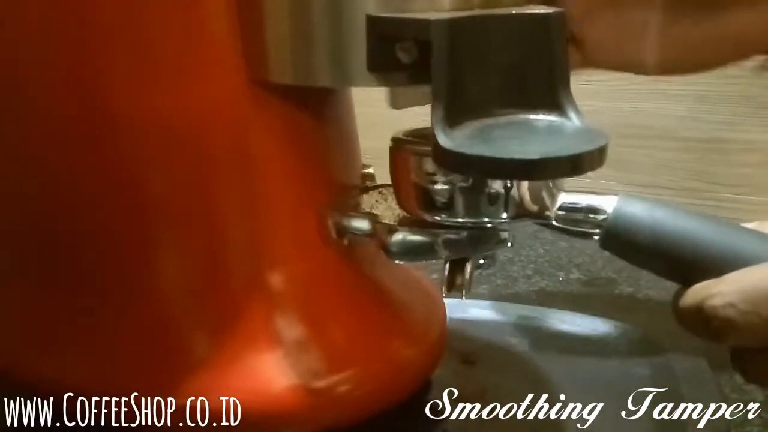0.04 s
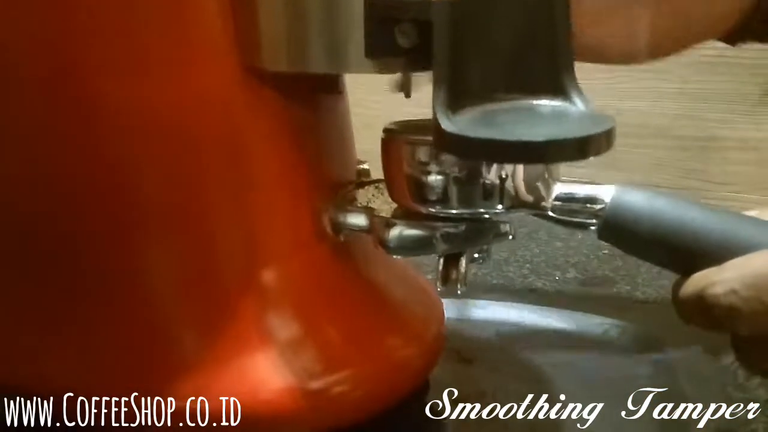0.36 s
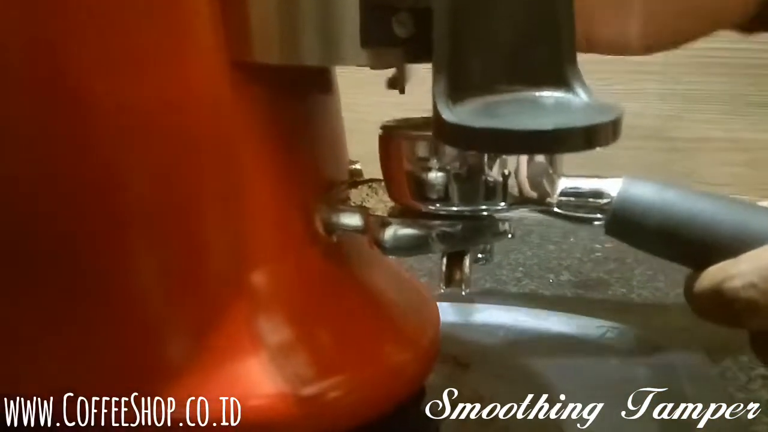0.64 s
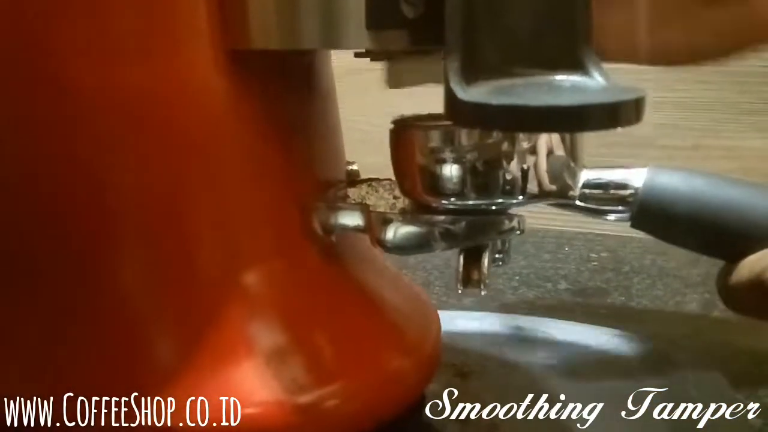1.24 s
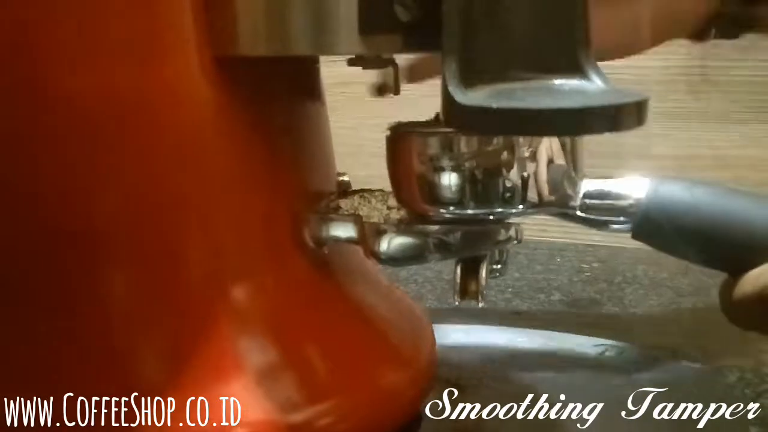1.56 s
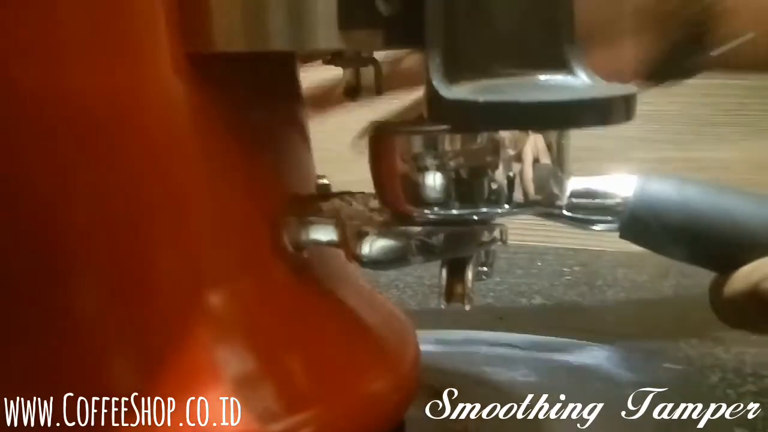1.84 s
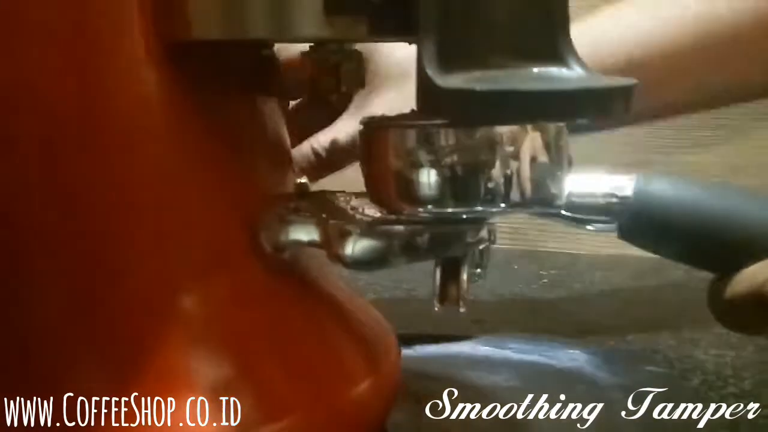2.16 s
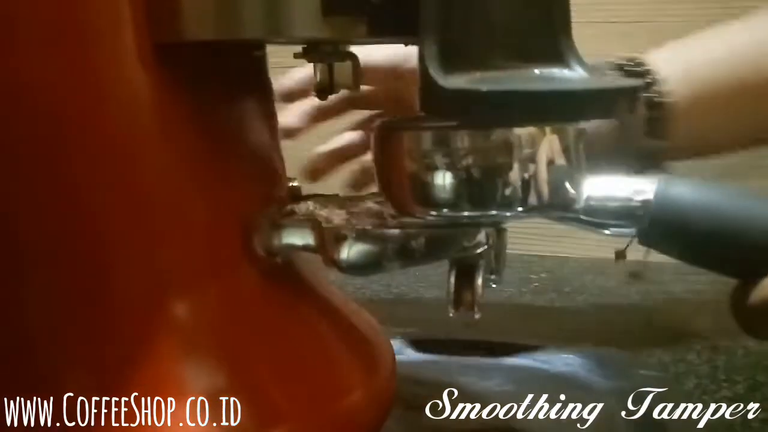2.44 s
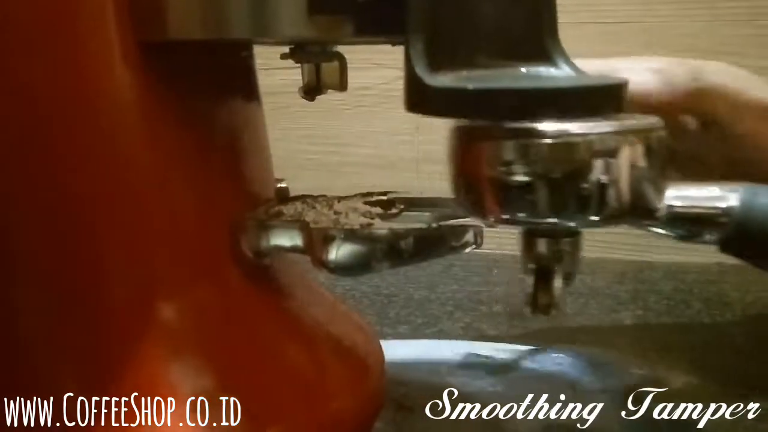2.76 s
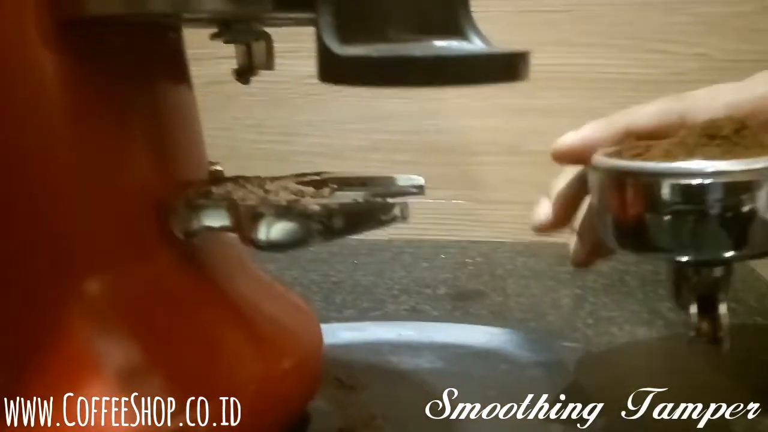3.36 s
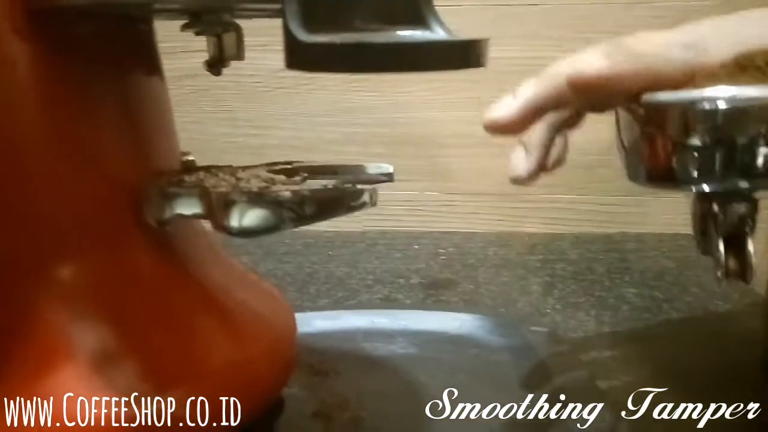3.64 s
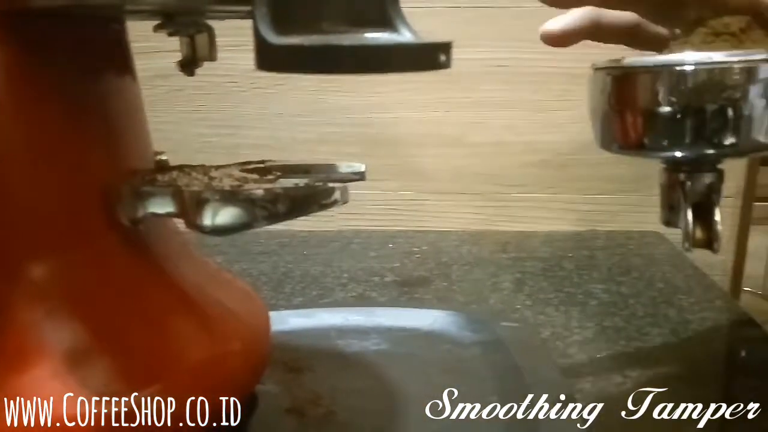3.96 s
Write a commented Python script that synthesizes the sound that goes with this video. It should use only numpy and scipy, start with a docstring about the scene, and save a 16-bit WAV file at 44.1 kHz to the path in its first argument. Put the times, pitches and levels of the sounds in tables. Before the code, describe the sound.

An electric coffee grinder crushes beans close by from the start, a gritty, ringing whir with scattered snaps and dull thuds. Near 1.9 seconds a sharp knock turns the tone more hollow. At 2.4 seconds the motor switches off and quickly runs down with a groan. Around 2.8 seconds a metal filter basket briefly scrapes and squeaks off its holder. Soft, steady room ventilation remains until the end.

```python
"""An electric coffee grinder crushes beans close by, over the steady air noise of a small cafe room.
Tiny cracks and the rubbing of its burrs (the grinding wheels) make its housing ring; single beans snap.
Near 1.9 s a knock changes the load, and the housing rings more hollow.
At 2.4 s the motor is switched off and runs down with a groan.
Last, near 2.8 s, the metal filter basket scrapes and squeaks as it slides off its fork."""
import sys
import numpy as np
from scipy import signal
from scipy.fft import rfft, irfft
from scipy.io import wavfile

SR = 44100
rng = np.random.default_rng(int(sys.argv[2]) if len(sys.argv) > 2 else 0)


def dump_mix(stems):
    """Bounce the given channels to the path in sys.argv[1] as a 16-bit WAV at rate SR."""
    frames = np.atleast_2d(stems).T  # one column per channel
    limited = np.clip(frames, -1, 1)  # hard clip at full scale
    pcm = np.round(limited * 32767).astype(np.int16)
    wavfile.write(sys.argv[1], SR, pcm)


N = 176400
T = np.arange(N) / SR


def amp(db):
    """Turns decibels into a number to multiply by."""
    return 10 ** (np.asarray(db) / 20)


def evened(x):
    """Scales a signal to an average (rms) size of 1."""
    return x / np.sqrt(np.mean(x ** 2) + 1e-20)


def at_pitch(points, hz):
    """Reads between the rows of a table, along a musical (log) pitch scale."""
    pitches, values = np.transpose(points)
    return np.interp(np.log(hz + 1), np.log(pitches + 1), values)


def over_time(points):
    """Joins the (time, value) rows of a table with straight lines."""
    return np.interp(T, *np.transpose(points))


def pan(db):
    """Left and right gains that make the left side louder by db."""
    return amp(np.array([[.5], [-.5]]) * db)


def colour(x, spectrum, balance=((1, 0), (2, 0))):
    """Filters white noise so that each pitch gets its own level and left-right balance."""
    hz = abs(np.fft.fftfreq(4096, 1 / SR))
    log_gain = np.log(amp(at_pitch(spectrum, hz)) * pan(at_pitch(balance, hz)) * np.sqrt(SR / 2))
    taps = np.fft.ifft(np.exp(np.conj(signal.hilbert(log_gain)))).real  # rings only after a hit
    return signal.oaconvolve(x, taps[:, :len(hz) // 2], axes=1)[:, :N]


def stereo(a, b, likeness):
    """Mixes two noises into left and right; likeness 1 is the same, 0 unrelated, -1 opposite."""
    same = np.clip(at_pitch(likeness, np.fft.rfftfreq(N, 1 / SR)), -1, 1)
    right = irfft(same * rfft(a) + np.sqrt(1 - same ** 2) * rfft(b), N)
    return np.array([a, right])


def resonate(x, hz, width_hz):
    """Rings at one pitch; the result is complex, so its wave can be shifted."""
    turn = np.exp(2j * np.pi * hz / SR)
    fade = np.exp(-np.pi * abs(width_hz) / SR)
    return 2 * signal.lfilter([(1 - fade) ** 2], [1, -2 * fade * turn, (fade * turn) ** 2], x)


def wander(hz):
    """A random wobble, mostly slower than hz."""
    smoothing = 1 + (np.fft.rfftfreq(N, 1 / SR) / hz) ** 2
    return evened(irfft(rfft(rng.standard_normal(N)) / smoothing, N))


def fuzzy_tone(hz, width_hz):
    """Noise narrowed to one pitch; the wider, the rougher."""
    return evened(resonate(rng.standard_normal(N), hz, width_hz).real)


# Steady rush of air: pitch_hz, level_db_per_hz
AIR_RUSH = [(20, -91), (50, -112), (105, -80), (150, -93.5), (260, -83), (400, -78), (520, -83), (630, -81),
            (800, -85), (1800, -87), (2400, -91), (3900, -91.5), (4600, -96.5), (5300, -99), (6200, -102),
            (6800, -112), (10000, -115), (16000, -119)]
# Low air noise that comes and goes: pitch_hz, level_db_per_hz
AIR_SWELL = [(20, -100), (100, -95), (180, -95), (290, -78.5), (450, -83.5), (620, -85), (900, -94.5),
             (2000, -94.5), (6000, -125)]
# How far the air leans left: pitch_hz, left_minus_right_db
AIR_BALANCE = [(60, 0.7), (180, 3.5), (550, 5.1), (1650, 8.9), (4970, 9.5), (15000, 2.7)]
# How alike its two sides are: pitch_hz, likeness
AIR_LIKENESS = [(60, 0.67), (180, 1), (550, 0.28), (1650, -0.23), (4970, -0.27), (15000, -0.51)]
def air():
    """Ventilation: a steady rush, slow low swells and a wavering hum."""
    rush = colour(stereo(*rng.standard_normal((2, N)), AIR_LIKENESS), AIR_RUSH, AIR_BALANCE)
    swells = colour(stereo(*rng.standard_normal((2, N)), AIR_LIKENESS), AIR_SWELL, AIR_BALANCE)
    swells *= amp(4.0 * wander(hz=8))
    hum = pan(-5) * amp(-56.5) * fuzzy_tone(hz=392.3, width_hz=17)
    return rush + swells + hum


# Time the echo takes to fade by 60 dB: pitch_hz, fade_s
ECHO_FADE = [(100, 1), (1500, 0.62), (4500, 0.71), (12000, 0.1)]
def room_echo(x):
    """The walls return a blur of echoes, each pitch fading at its own speed."""
    hz, t, noise = signal.stft(rng.standard_normal((2, SR // 2)), SR, nperseg=256)
    fade = amp(-60 * t / at_pitch(ECHO_FADE, hz)[:, None])
    tail = signal.istft(noise * fade * (t > .005), SR, nperseg=256)[1]
    return signal.fftconvolve(x, tail / np.linalg.norm(tail[0]), axes=1)[:, :N]


def crunch(cracks_per_s=2500, spread_db=3, crack_share=0.6):
    """The hiss of rubbing, mixed with many tiny cracks of random size."""
    sizes = amp(spread_db * np.minimum(rng.exponential(1, N), 5)) * rng.choice([-1, 1], N)
    cracks = evened(sizes * (rng.random(N) < cracks_per_s / SR))
    return np.sqrt(crack_share) * cracks + np.sqrt(1 - crack_share) * rng.standard_normal(N)


# The basket catching on its fork: start_s, length_s, pitch_hz, level_db, width_hz
SQUEAKS = [(2.772, 0.012, 3530, -53, 298), (2.794, 0.0074, 3280, -44.5, 257),
           (2.799, 0.011, 1320, -44.5, 170), (2.828, .012, 1347, -48, 120), (2.821, 0.0098, 3090, -49, 149),
           (2.822, 0.025, 3980, -69, 86), (2.836, 0.016, 2030, -45.5, 22.2)]
# How the scrape grows and fades: time_s, gain_db
SCRAPE_LEVEL = [(2.6, -23), (2.7, -7.5), (2.76, -13.5), (2.8, -6.5), (2.84, -7), (2.87, -13), (2.95, -37)]
# Tone colour of the scrape: pitch_hz, level_db_per_hz
SCRAPE_COLOUR = [(100, -105), (1000, -79.5), (3500, -77), (5500, -87), (8000, -97), (10000, -102),
                 (16000, -102)]
def basket(rise_s=0.0061, ring_cycles=110, overtone_db=-18):
    """Metal scrapes on metal, catching in short unsteady squeaks that ring on."""
    squeaks = np.zeros(N)
    for start_s, length_s, hz, db, width_hz in SQUEAKS:
        phase = 2 * np.pi * np.cumsum(hz + .5 * width_hz * wander(hz=244)) / SR
        rise = np.clip((T - start_s) / rise_s, 0, 1)
        fade = np.exp(-np.maximum(T - start_s - length_s, 0) * (hz / ring_cycles + width_hz / 2))
        wave = np.sin(phase) + amp(overtone_db) * np.sin(2 * phase)
        squeaks += amp(db) * rise * fade * np.sqrt(2) * wave
    scrape = colour(amp(over_time(SCRAPE_LEVEL)) * np.array([crunch(), crunch()]), SCRAPE_COLOUR)
    return pan(4.5) * (squeaks + scrape)


def blows(hits, spectrum, crack_s, rattle_db, rattle_s, push_db, pan_db, likeness):
    """Each blow is a blunt push and a short crack, then a weaker rattle of loose parts."""
    power, push = np.zeros((2, N))
    for start_s, db in hits:
        after = slice(round(start_s * SR), round(start_s * SR) + SR // 2)
        age = T[after] - T[after][0]
        fade = np.exp(-age / crack_s) + amp(rattle_db) * np.exp(-age / rattle_s)
        power[after] += (amp(db) * fade) ** 2
        push[after] += amp(db + push_db) * np.exp(-age / 0.00025)
    noise = stereo(*rng.standard_normal((2, N)), [(600, likeness), (2500, 0.02)])
    return pan(pan_db) * colour(push + np.sqrt(power) * noise, spectrum)


# Each thud: start_s, gain_db
THUDS = [(.43, -5.5), (.825, -6.5), (1.06, -23), (1.097, -8.5), (1.884, -8), (2.33, -8), (2.345, -3)]
# Tone colour of a thud: pitch_hz, level_db_per_hz
THUD_COLOUR = [(30, -84), (150, -63), (260, -65.5), (400, -56.5), (620, -51.5), (850, -56.5), (1150, -60),
               (1800, -51), (3500, -59), (6000, -64), (9000, -90), (16000, -100)]
def thuds():
    """Dull thuds as the load catches and the switch opens."""
    return blows(THUDS, THUD_COLOUR, crack_s=0.0064, rattle_db=-5, rattle_s=0.05,
                 push_db=-12, pan_db=2.5, likeness=0.77)


# The knock and its bounces: start_s, gain_db
KNOCKS = [(1.8625, 0.5), (1.8665, -4.5), (1.8821, -4.5)]
# Tone colour of the knock: pitch_hz, level_db_per_hz
KNOCK_COLOUR = [(30, -83), (160, -52), (330, -62), (650, -44.5), (1050, -48.5), (1500, -55), (3200, -44.5),
                (4500, -54.5), (5700, -54), (7200, -60), (9000, -77), (16000, -66)]
def knock():
    """A sharp knock on the housing bounces twice."""
    return blows(KNOCKS, KNOCK_COLOUR, crack_s=0.0024, rattle_db=-12, rattle_s=0.05,
                 push_db=-2.5, pan_db=4, likeness=0.37)


# Each bean that snaps: start_s, gain_db
SNAPS = [(.1466, -19), (.288, -1.5), (.435, -9), (.7138, -1), (.7175, -8), (1.1194, -2.5), (1.3374, -13),
         (1.499, 0)]
# Tone colour of a snap: pitch_hz, level_db_per_hz
SNAP_COLOUR = [(100, -68), (1500, -73), (3800, -42), (6000, -58), (9000, -68), (12500, -76), (16000, -74)]
def bean_snaps():
    """Single beans break with a bright crack."""
    return blows(SNAPS, SNAP_COLOUR, crack_s=0.0029, rattle_db=-22, rattle_s=0.045,
                 push_db=-2, pan_db=5.5, likeness=.3)


# Thin whine of the motor: pitch_hz, level_db
WHINE = [(9190, -63), (10220, -66), (13110, -65)]
def motor(force, after_knock):
    """The motor whines and drones, droning louder after the knock, and groans as it slows."""
    drone = force * amp(-45 + 5 * after_knock) * fuzzy_tone(hz=524.3, width_hz=43.5)
    slowing = np.exp(-((T - 2.51) / .07) ** 2)  # a short swell around 2.51 s
    groan = amp(-50) * slowing * fuzzy_tone(hz=178, width_hz=85)
    whine = force * sum(amp(db) * fuzzy_tone(hz, width_hz=36) for hz, db in WHINE)
    return pan(1) * (drone + groan) + whine


# Pitches at which the housing rings:
# pitch_hz, width_hz, level_db_per_hz, left_minus_right_db, left_lead_rad, change_after_knock_db
HOUSING_RINGS = [(426, 39, -65.5, 13, 1.5, 1), (777.4, 51, -55, 2.5, -2, 2.5),
                 (1261, 51, -56.5, -10, -3.34, -4), (1374, 88, -44.5, 4.5, -2.5, 2),
                 (1427.7, 66.5, -39.5, 0.5, -2.5, 3.5), (1570, 78, -53.5, -3, -1, -14),
                 (1709, 73, -57, 5.5, 4, 7.5), (2027, 39, -56.5, 8, 1, -0.5),
                 (2404, 107, -60.5, 17.5, -4.5, -1), (3682, 157, -60.5, 13.5, 2.5, 2.5),
                 (3824, 165, -54, 8, 5, -2.5), (4252, 200, -50.5, 14, 1.45, -3.5),
                 (4450, 200, -60.5, 14, 2.5, -2.5), (5560, 260, -72.5, 6.5, 1, 6),
                 (8150, 316, -73.5, 10.5, 1.5, -5), (11920, 250, -78, 13, 1.5, -3)]
def housing(force, after_knock):
    """Crushing makes the housing ring, more hollow after the knock."""
    out = np.zeros((2, N))
    for hz, width_hz, db, pan_db, lead_rad, change_db in HOUSING_RINGS:
        shaking = force * crunch() * amp(db + change_db * after_knock)
        ring = resonate(shaking, hz, width_hz) * np.sqrt(SR / 2)
        out += pan(pan_db) * np.array([ring.real, (ring * np.exp(-1j * lead_rad)).real])
    return out


# How hard the grinder works: time_s, gain_db
LOAD = [(0, 1), (.3, 0.5), (.5, .5), (.74, -1.5), (.98, 1), (1.2, 0), (1.7, 0), (2.05, 0), (2.3, -0.5),
        (2.39, -0.5)]
def burr_force(off_s=2.402, halt_s=2.505, still_s=2.59, shaft_hz=24.54):
    """The force follows the load, chatters and throbs with the shaft; switched off, it dies away."""
    drop_db = 5 * np.clip((T - off_s) / 0.014, 0, 1)
    coast_db = 62 * np.maximum(T - off_s, 0)
    halt_db = 185 * np.clip(T - halt_s, 0, .035) + 118 * np.maximum(T - still_s, 0)
    chatter_db = 0.59 * wander(hz=70)
    throb = 1 + 0.042 * np.sin(2 * np.pi * shaft_hz * T)
    return amp(over_time(LOAD) - drop_db - coast_db - halt_db + chatter_db) * throb


# Ups and downs in the grinding: time_s, ring_gain_db, grit_gain_db
SWELLS = [(0, 0.5, 5), (.08, 1, -3), (.22, -2, -3), (.32, 0, 0), (.5, 2.5, -1.5), (.72, -3, 0),
          (.85, 1, -1), (.99, -0.5, 1), (1.1, -3, -1.5), (1.23, 0, -.5), (1.38, -4.5, -0.5),
          (1.55, .5, -0.5), (1.76, -4.5, 0), (1.87, -3, -2), (1.95, -1.5, 0.5), (2.18, 0, 1.5),
          (2.28, -4.5, 0), (2.39, -6.5, 0.5)]
def swell(x, ring_hz=1420, ring_span_hz=190, grit_hz=2500, grit_span_hz=920):
    """The hollow ring and the gritty middle pitches each grow louder and softer."""
    times, ring_db, grit_db = np.transpose(SWELLS)
    hz, spectrum = np.fft.rfftfreq(N, 1 / SR), rfft(x)
    for centre, span, db in (ring_hz, ring_span_hz, ring_db), (grit_hz, grit_span_hz, grit_db):
        band = irfft(spectrum * np.exp(-((hz - centre) / span) ** 2), N)
        x = x + (amp(np.interp(T, times, db)) - 1) * band
    return x


# Tone colour of the grinding: pitch_hz, level_db_per_hz
GRIND_COLOUR = [(20, -74.5), (100, -72), (200, -71), (450, -74), (650, -67), (900, -71), (1150, -74.5),
                (1500, -74), (1800, -55.5), (2220, -64.5), (2600, -60), (3000, -61.5), (3200, -63),
                (3450, -56), (4050, -60.5), (4500, -60), (4800, -65), (5200, -72), (5800, -70), (6800, -77),
                (7800, -78.5), (8700, -82.5), (11500, -82.5), (12700, -84.5), (15800, -83.5)]
# How far the grinding leans left: pitch_hz, left_minus_right_db
GRIND_BALANCE = [(30, 4), (300, 8.5), (1000, 9), (2200, 0.5), (3000, 11), (3600, 3), (4300, 1.5), (5200, 4),
                 (6500, 1), (7600, 4.5), (9500, 1.5), (15000, 2)]
# How alike its two sides are: pitch_hz, likeness
GRIND_LIKENESS = [(30, -0.24), (150, 0.49), (500, -0.023), (900, 0.43), (1800, -0.72), (2400, 0.25),
                  (3300, -.25), (4200, -0.56), (5000, -0.15), (7000, -0.08)]
def grinder(load_change_s=1.885):
    """The burrs crush beans; the same force drives the ringing housing and the motor's sound."""
    force = burr_force()
    after_knock = np.clip((T - load_change_s) / 0.016, 0, 1)  # 0 before, 1 after
    crushing = force * stereo(crunch(), crunch(), GRIND_LIKENESS)
    grinding = colour(crushing, GRIND_COLOUR, GRIND_BALANCE)
    return swell(grinding + housing(force, after_knock) + motor(force, after_knock))


def scene():
    """The nearby sounds, their echo and the air of the room."""
    near = bean_snaps() + knock() + thuds() + grinder() + basket()
    return near + amp(-18) * room_echo(near) + air()


def record(dry, ceiling=.92, top_hz=15850):
    """Rounds off the tallest peaks, then removes the very highest pitches."""
    rounded = dry / (1 + (dry / ceiling) ** 8) ** (1 / 8)
    low_pass = signal.firwin(511, top_hz, window=("kaiser", 9), fs=SR)
    return signal.oaconvolve(rounded, low_pass[None], "same")


dry = scene()
out = record(dry)
dump_mix(out)
```